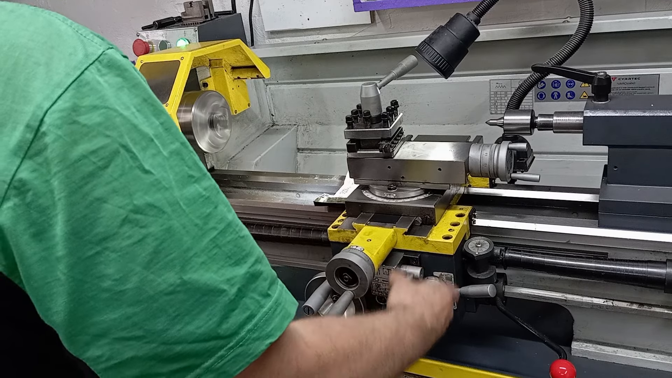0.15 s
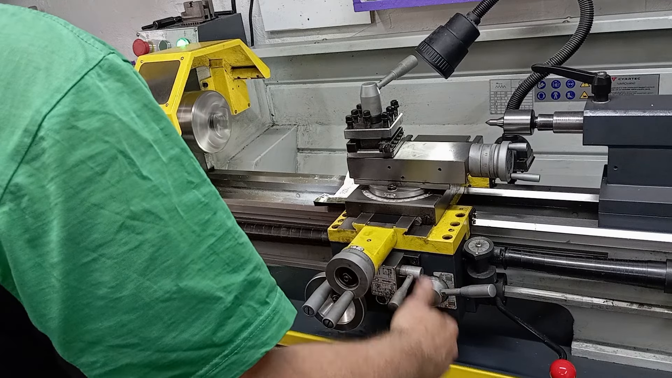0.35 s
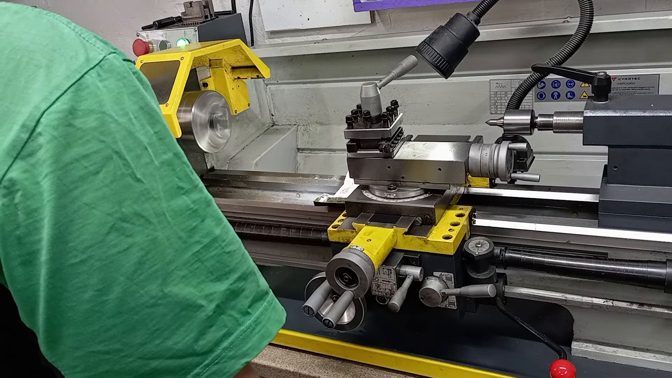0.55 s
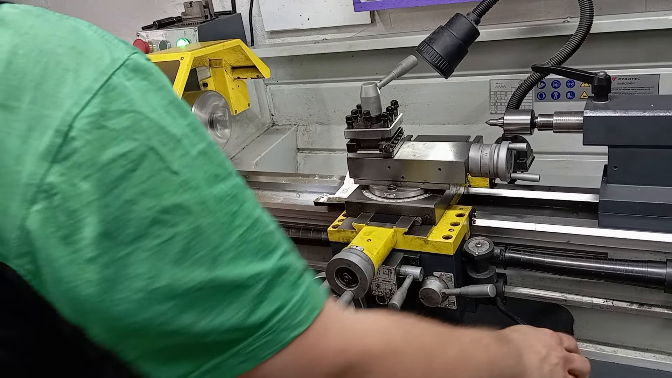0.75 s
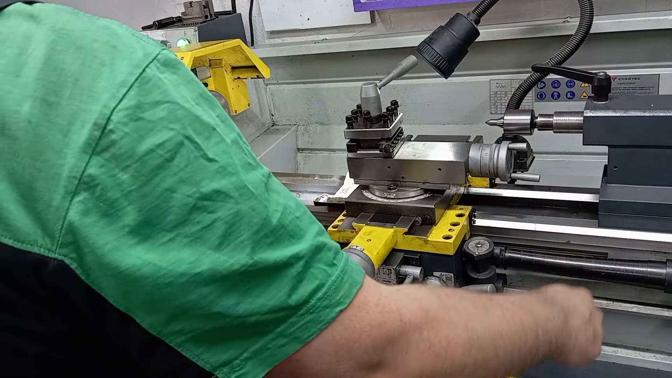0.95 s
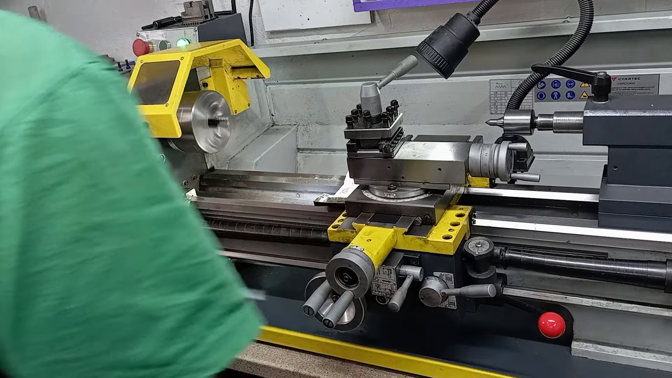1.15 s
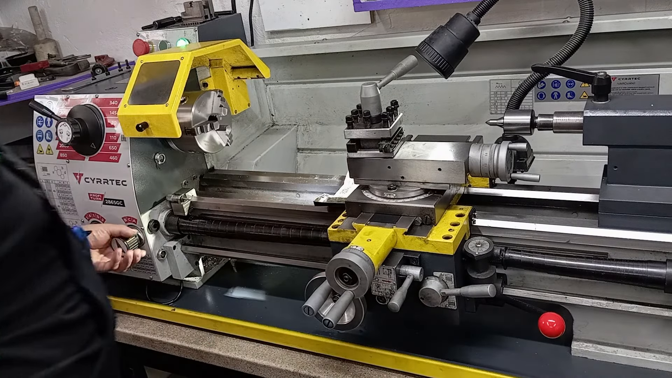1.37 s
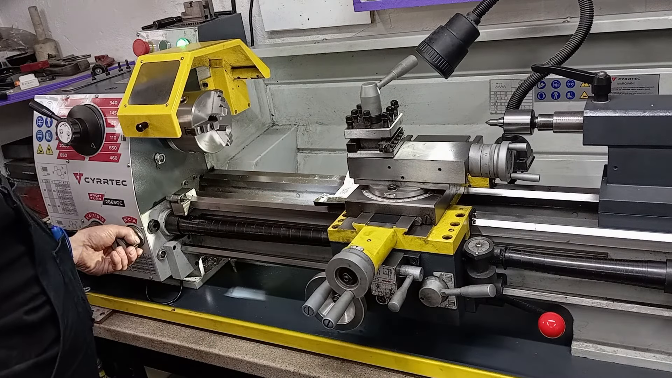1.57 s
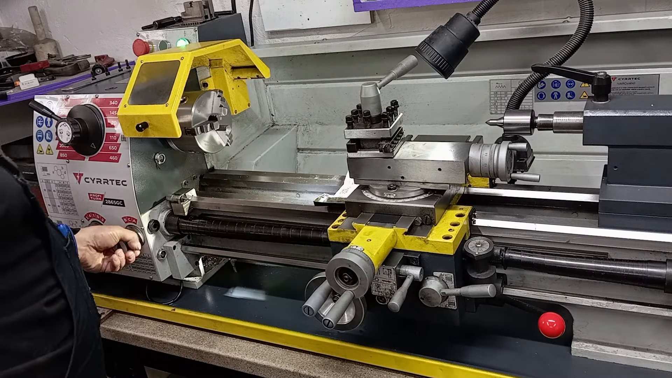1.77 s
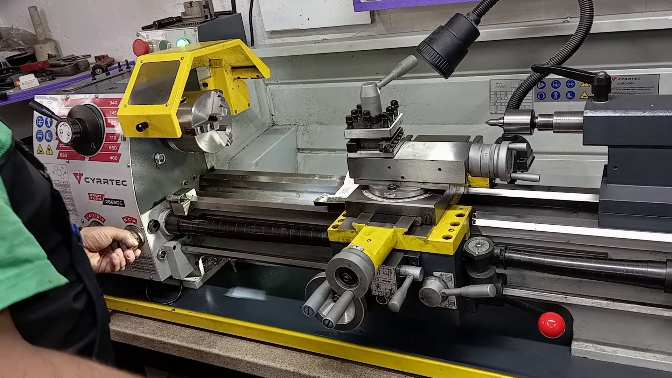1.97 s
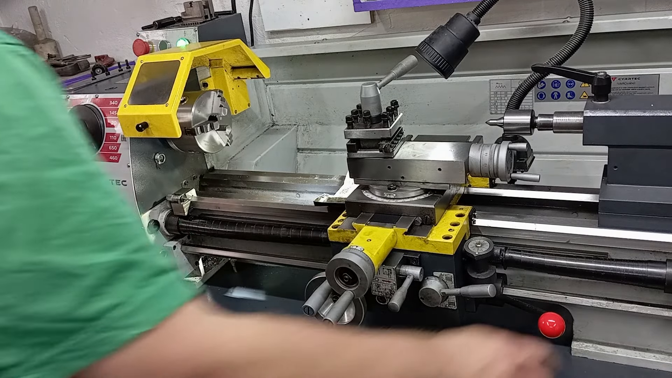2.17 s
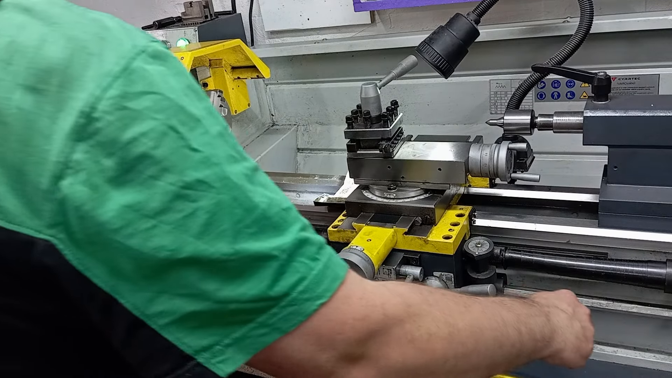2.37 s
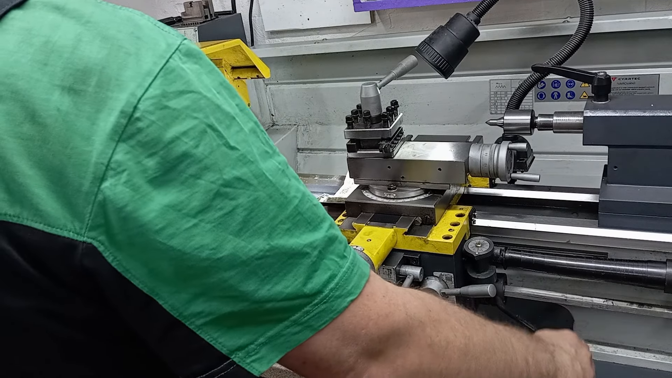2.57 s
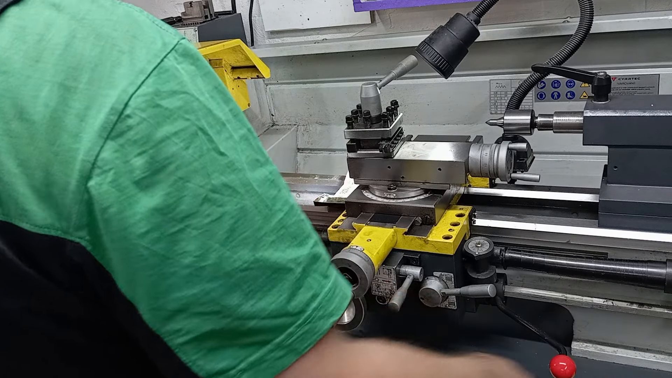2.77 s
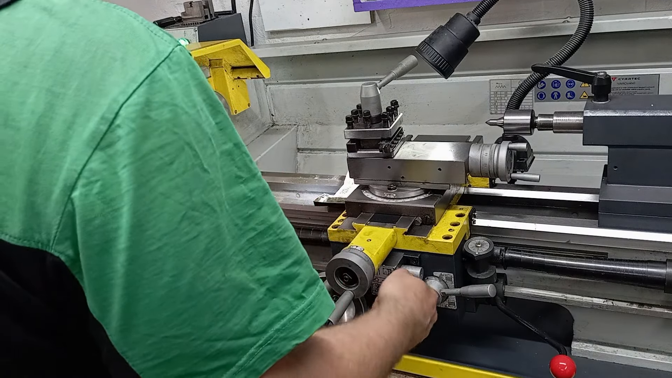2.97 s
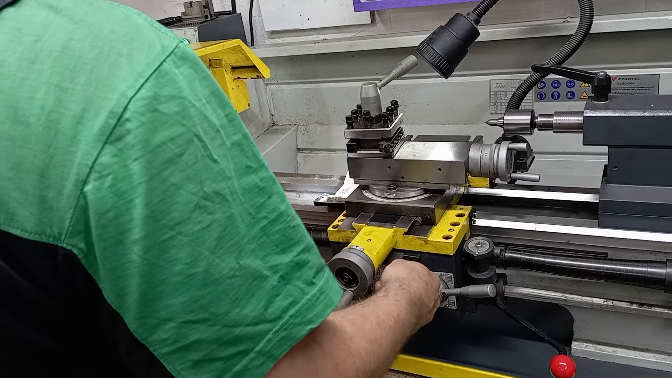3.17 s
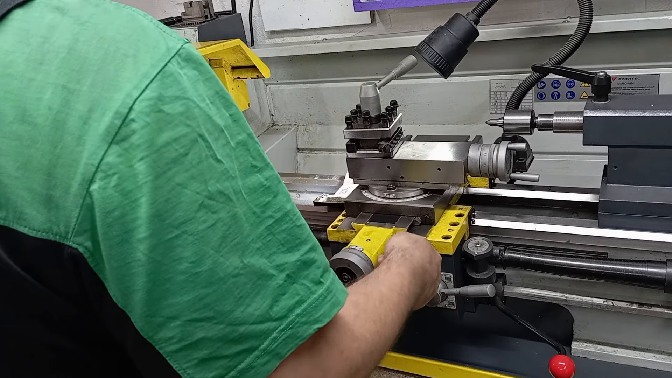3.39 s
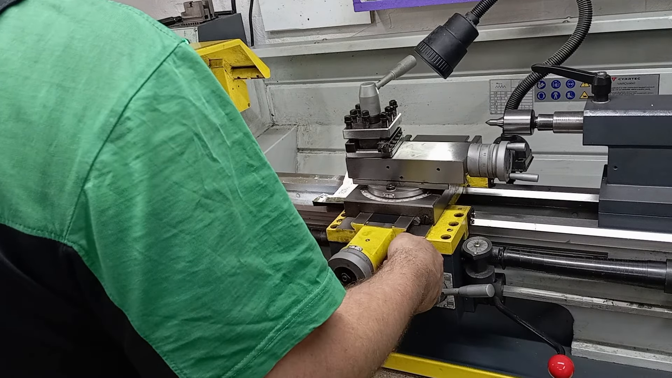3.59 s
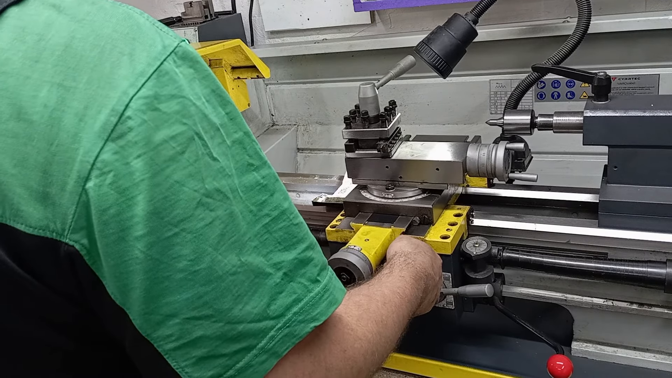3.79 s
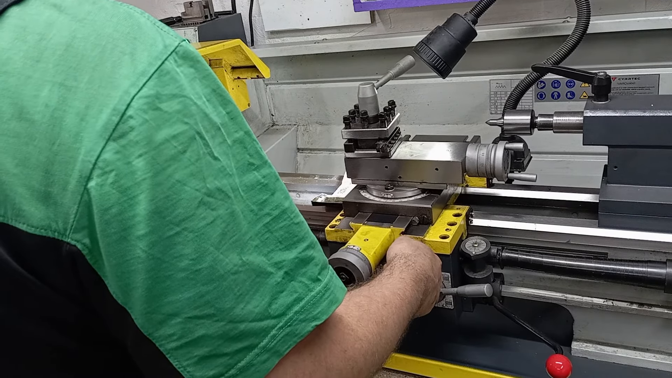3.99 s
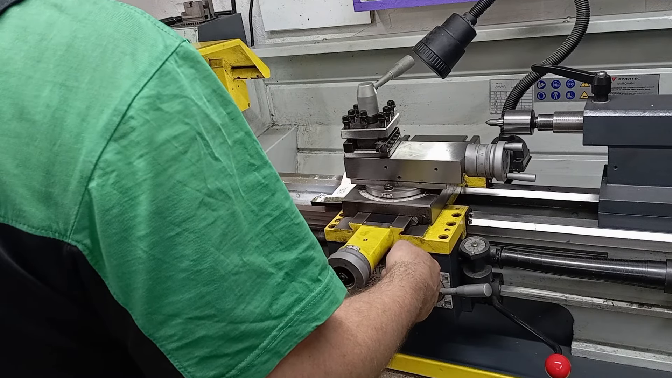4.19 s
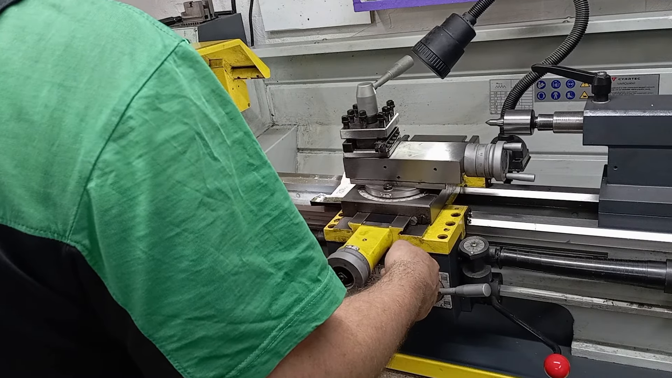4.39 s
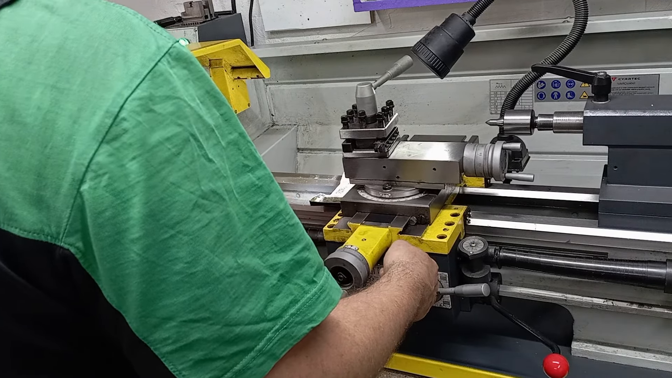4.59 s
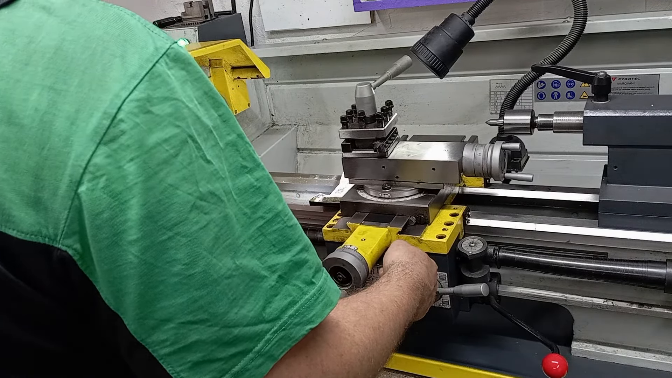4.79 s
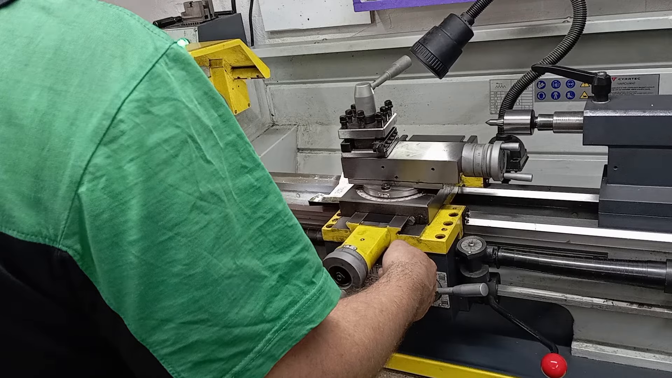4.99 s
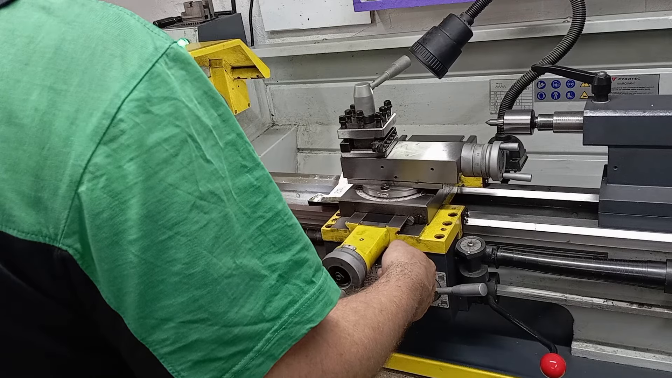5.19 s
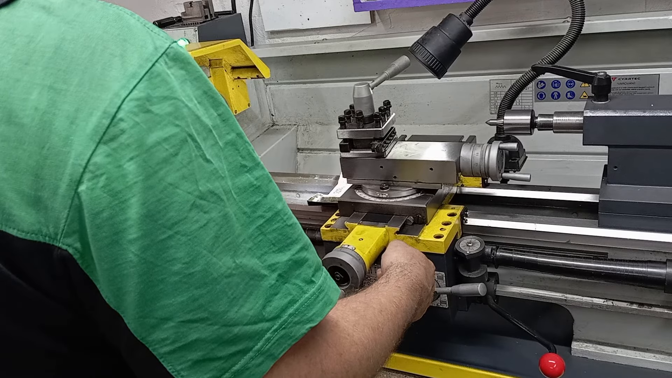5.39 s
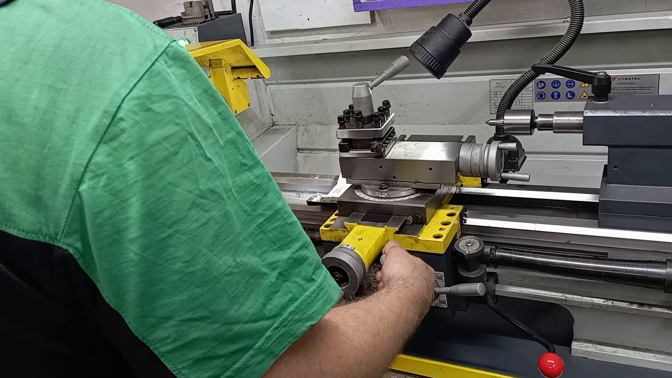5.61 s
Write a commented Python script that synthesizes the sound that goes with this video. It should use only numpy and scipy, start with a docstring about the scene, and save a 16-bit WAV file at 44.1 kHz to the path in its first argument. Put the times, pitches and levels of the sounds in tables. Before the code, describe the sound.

A lathe headstock drones with a piercing, slightly wavering gear whine over rough casting rattle. A metallic clunk cuts power; pitch and brightness fall away in under half a second. Quiet air, soft clothing movement and a sharp lever clack follow. A loud, dense switch clack brings the whine straight back, now with a regular feed-shaft knock emerging. Close, dry workshop pickup, lightly hollow from a near reflection, with little deep bass.

```python
"""In a small workshop a geared lathe headstock whines, is switched off, coasts to a stop and starts again
after a lever is shifted. Gear teeth sing as sines with shaft sidebands; their rattle is noise shaped by the
resonances of the cast housing. A feed shaft then adds orders that gather into a knock each turn. Levers and
switch are decaying noise and modes, over quiet air and rustling clothes; a close reflection combs it all."""
import sys
import numpy as np
from scipy import signal
from scipy.fft import rfft, irfft, next_fast_len
from scipy.io import wavfile
from scipy.ndimage import uniform_filter1d

SR = 44100
rng = np.random.default_rng(int(sys.argv[2]) if len(sys.argv) > 2 else 0)


def store_pcm(level_fs):
    """Save levels as 16-bit WAV."""
    pcm = np.round(np.clip(level_fs, -1, 1) * 32767).astype(np.int16)
    wavfile.write(sys.argv[1], SR, np.atleast_2d(pcm).T)


N = 249159
TIME = np.arange(N) / SR
KNOTS = np.arange(0, N + 256, 256) / SR  # coarse times, in seconds, for slow changes

# All source levels hold before the reflection and the microphone.
# Lines of the main gear mesh. Each row: mesh harmonic, slow-shaft sideband, fast-shaft sideband,
# level before the shift in dB, level after it in dB.
MESH = [(1, 0, 0, -46, -46), (2, -2, 0, -58, -58), (2, -1, 0, -63, -60), (2, 0, 0, -59, -58),
        (3, -2, 0, -60, -64), (3, -1, 0, -58, -57), (3, 0, 0, -47, -49), (3, 1, 0, -56, -58),
        (4, -1, 0, -64, -61), (4, 0, -2, -60, -64), (4, 0, 0, -64, -57), (4, 0, 1, -68, -64),
        (5, -2, 0, -55, -68), (5, -1, 0, -59, -58), (5, 0, -1, -56, -57), (5, 0, 0, -62, -55),
        (5, 1, -1, -60, -67), (6, 0, -2, -59, -65), (6, 0, 0, -57, -68), (6, 1, 0, -60, -69),
        (7, 0, 0, -61, -67), (8, -2, -1, -54, -74), (8, -1, -1, -54, -55), (8, -1, 0, -58, -50),
        (8, 0, -1, -54, -51), (8, 0, 0, -54, -53), (8, 1, 0, -58, -55), (10, -1, -1, -73, -63),
        (10, -1, 0, -79, -57)]
# Other meshes and the motor hum. Each row: frequency at full speed in Hz, level before the shift in dB,
# level after it in dB.
TONES = [(183.7, -90, -81), (195.1, -78, -85), (200.2, -74, -73), (206.6, -73, -80), (297.4, -79, -80),
         (400.0, -67, -68), (469.4, -66, -65), (494.3, -61, -61), (702.9, -65, -64), (733.8, -72, -59),
         (800.4, -59, -59), (1066.2, -62, -55), (1089.1, -66, -60), (1158.8, -57, -49), (1170.2, -58, -62),
         (1199.5, -52, -56), (1240.9, -57, -60), (1280.2, -61, -63), (1286.9, -56, -57), (1297.7, -67, -59),
         (1303.4, -50, -48), (1355.6, -58, -56), (1487.1, -65, -65), (1564.5, -60, -66), (1668.5, -62, -60),
         (1772.8, -57, -60), (1787.9, -63, -63), (1929.2, -58, -58), (1981.4, -63, -66), (2264.7, -62, -63),
         (2317.5, -61, -58), (2398.6, -63, -66), (2502.9, -56, -58), (2515.0, -66, -63), (2837.7, -68, -64),
         (3493.4, -62, -68), (3500.8, -62, -72), (3650.2, -69, -64), (3731.3, -60, -69), (3742.7, -64, -61),
         (3754.5, -56, -52), (3760.9, -69, -53), (3895.5, -64, -57), (3914.3, -61, -64), (4030.1, -56, -70),
         (4041.5, -59, -67), (4049.6, -58, -65), (4055.6, -62, -58), (4062.7, -68, -61), (4568.7, -64, -62),
         (4588.3, -58, -66), (4722.5, -68, -60), (5415.6, -63, -62), (5423.3, -59, -66), (6245.6, -66, -60),
         (6257.4, -60, -61), (6453.9, -59, -71), (6662.8, -76, -66), (7914.1, -71, -64), (7966.3, -69, -65)]
# Orders of the feed shaft, which the shift engages. Each row: order, level in dB.
FEED_ORDERS = [(17, -89), (19, -79), (20, -71.5), (23, -75), (24, -71), (25, -71), (26, -68), (27, -66),
               (28, -75), (29, -69), (31, -71), (32, -69), (33, -72), (34, -66), (35, -65), (36, -61),
               (38, -72), (39, -61), (40, -66), (42, -72), (47, -72), (48, -74), (51, -65), (54, -53),
               (55, -64), (57, -62), (58, -71), (62, -67)]
# Broad radiation of the casting. Each row: frequency in Hz, relative level in dB per Hz.
CASTING = [(40, -117), (90, -116), (160, -103), (300, -97.5), (500, -85.5), (1000, -80), (1700, -87),
           (2600, -84), (4000, -82), (6000, -83.5), (8000, -85), (10500, -85.5), (13000, -94.5),
           (15800, -103)]
# Resonances of the housing. Each row: frequency in Hz, width in Hz, level over the casting in dB.
HOUSING = [(394, 39, 1.5), (520, 89, 7.5), (723, 49, 7), (1343, 360, 6), (2030, 690, 3.5), (2080, 50, 8.5),
           (2509, 84, 7), (3780, 210, 3.5), (4090, 38, 7.5), (4240, 115, 7), (4676, 249, 5.5),
           (5087, 40, 11.5), (5580, 45, 8), (6320, 510, 5), (7040, 350, -1), (7937, 85, 7.5),
           (8130, 55, -2), (8280, 190, 5), (8545, 53, 19.5), (8716, 120, 12.5), (9330, 180, 5.5),
           (10490, 51, 11.5), (10745, 105, 10), (10880, 45, 10.5), (11530, 58, 8.5), (11980, 430, 11.5),
           (12840, 180, 12), (13000, 210, -4), (13900, 185, 15), (15000, 370, -8)]
# Modes that the gliding mesh tones cross. Each row: frequency in Hz, width in Hz, gain in dB.
SWEPT_MODES = [(564, 23, -52), (838, 11.6, -29.5), (1400, 40, -71), (1838, 23, -37.5)]
# Plates that ring on as the shafts stop. Each row: frequency in Hz, starting level in dB, t60 in seconds.
PLATES = [(280, -75, .9), (743, -74, .8), (1174, -74, 1), (1297, -71, .9), (1384, -70, .4)]
# Knocks of lever and switch. Each row: start in seconds, nominal peak in dB, centre in Hz, fall from it in
# dB per octave, t60 at the centre in seconds, thud over the peak in dB, thud pitch in Hz.
KNOCKS = [(1.031, -47, 500, -17, 0.082, 10.5, 317), (1.046, -35, 1550, 8, 0.083, 5.5, 478),
          (1.075, -27, 1400, 5, 0.14, -10, 496), (1.669, -52.5, 3500, 7, 0.086, -8, 444),
          (1.8532, -28.5, 5540, 6, 0.03, -33, 523), (1.858, -35, 2250, 4, 0.16, -5.5, 540),
          (2.1, -58, 3500, 11, 0.084, 0, 150), (2.136, -80.5, 1000, 0, 0.05, 22, 173),
          (2.384, -64, 8000, 9, 0.077, -21, 200), (2.66, -29, 3000, 8, 0.055, -2, 600),
          (2.663, -23, 7000, 14, 0.027, -5, 450), (2.665, -23, 1600, 9.5, 0.2, -9.5, 785),
          (2.671, -28.5, 2300, 22, 0.13, -12, 600), (2.678, -29, 1960, 6, 0.088, 0, 813),
          (2.683, -25.5, 1500, 5.5, 0.12, -8, 800), (2.691, -29, 2000, 8, 0.12, 0, 447)]
# Modes of the lever. Each row: frequency in Hz, relative level in dB, t60 in seconds.
LEVER_MODES = [(515, -9, 0.46), (1386, -2, 0.1), (1860, -18, 0.18), (1990, -15, 0.12), (2565, -6, 0.063),
               (3700, -14, 0.093), (3720, -5, 0.046), (4620, -21, 0.099), (4830, -25, 0.17),
               (6430, -19, 0.059), (7400, -23, 0.073), (8511, -33, 0.19), (8800, -23, 0.1),
               (11100, -32.5, 0.11)]
# Low modes of the bed under a thud. Each row: frequency in Hz, relative level in dB.
BED_MODES = [(150, 4), (172, 4), (317, 2), (445, -4), (478, -16), (540, -9), (605, -19), (790, 3), (815, 0)]
# Spectrum of the workshop air. Each row: frequency in Hz, relative level in dB per Hz.
AIR = [(24, -63), (40, -37.5), (90, -16), (139, -1), (174, -6.5), (591, 3), (1250, -6.5), (1860, -16.5),
       (3140, -15), (4030, -3.5), (5300, -18.5), (15500, -19.5)]
# Faint tones in the workshop. Each row: frequency in Hz, level in dB.
FAINT_TONES = [(597.5, -88), (1217, -95.5), (1809, -92.5), (1860, -95.5), (3518, -93), (3898, -91),
               (4161, -96.5)]
# Rustles of clothes and hands. Each row: loudest moment in seconds, level in dB, rise in dB per second,
# fall in dB per second.
RUSTLES = [(1.44, -74.5, 98, 34), (2.1, -80, 107, 500), (2.25, -82.5, 33, 30), (2.39, -87, 900, 60),
           (2.47, -72, 350, 40)]
# Spectrum of cloth. Each row: frequency in Hz, relative level in dB per Hz.
CLOTH = [(350, -30), (600, -8), (1050, -11), (1400, -3), (1750, -2.5), (2400, -7.5), (3470, -8),
         (8290, -10.5), (15500, -24)]

SHIFT_S = 2
MESH_HZ, SLOW_SHAFT_HZ, FAST_SHAFT_HZ, FEED_HZ = 1072.63, 11.6, 51.8, 13.516  # rates at full speed
OFF_S, UNLOAD_S, STOP_S = 1.04, .035, 1.45  # motor off, time for the teeth to unload, shafts at rest
ON_S, SPIN_UP_S, LOAD_S = 2.665, .046, .03  # motor on, time to full speed, then to full load
FULL_S = ON_S + SPIN_UP_S
FIRST_SPEED = 1.0009  # before the shift, as a share of the speed after it

RATTLE_DB, RATTLE_TILT = -35.5, 0.32  # nominal level at full speed and load in dB, tilt in dB per octave
SLOWING_DB, SLOWING_TILT = 24.5, 5.6  # lost for each tenfold drop of speed: dB, dB per octave
LOOSE_DB, LOOSE_TILT = 2.2, -1.01  # unloaded teeth while coasting: louder in dB, duller in dB per octave
LOOSE_RING_DB, SHARP_HZ, SHARP_FROM_HZ = -8, 130, 7500  # unloaded: narrower, higher resonances ring less
REST_SPEED, REST_S = .035, 0.14  # share of speed added while coasting; its fading time after the stop
JOLT_SPEED = 0.081  # share of speed added to set the brightness of the restart
JOLT_DB = -1  # at the first blow, closing to 0 as speed builds up
SETTLE_DB, SETTLE_TILT, SETTLE_S = -1, -1.6, 0.04  # restart offsets in dB and dB per octave; time to settle
SOFT_HZ, SOFT_DB = 40200, 9.5  # above this pitch times the speed the rattle falls, in dB per octave
SWELL_DB = 0.08  # rms of slow chance in the rattle
FEED_KNOCK_S = 4.532  # time of one feed knock
FEED_SCATTER, FEED_LOCK_S = 0.086, 0.48  # share of phase scatter that stays; decay time of the rest
KNOCK_TOP_HZ = 455  # feed orders below this line up
PLATES_S = 1.4
THUD_FALL_DB = 39  # per octave away from the pitch of the thud
AIR_DB = -75
RUSTLE_END_S = 2.63  # the hand comes to rest on the switch
ECHO_S, ECHO_SHARE = .000465, .55
MIC_HZ, EDGE_HZ = 129, 15740  # bass corner of the microphone, upper band limit


def amp(db):
    """Decibel law: gain of a level in dB."""
    return 10 ** (np.asarray(db) / 20)


def evened(x):
    """Normalization of power: scales to rms 1."""
    return x / np.sqrt(np.mean(x ** 2) + 1e-20)


def read(points, hz):
    """Linear interpolation of a spectrum in dB on a log-frequency axis."""
    f, value = np.transpose(points)
    return np.interp(np.log(hz + 1), np.log(f + 1), value)


def add(mix, s, sound):
    """Superposition: mixes a sound in at s seconds."""
    part = mix[round(s * SR):][:len(sound)]
    part += sound[:len(part)]


def drift(fastest_hz, count=16):
    """Sum of slow sines in random phase: chance of rms 1 at the coarse times."""
    hz = np.geomspace(.3, fastest_hz, count)[:, None]
    waves = np.sin(2 * np.pi * (hz * KNOTS + rng.random((count, 1))))
    return evened((waves / np.sqrt(hz)).sum(0))


def each_sample(slow):
    """Linear interpolation from the coarse times to every sample."""
    return np.interp(TIME, KNOTS, slow)


def noise(colour_db, patchy_db, size=2048):
    """Random short-time spectra: colour_db(hz, s) is the level, and smooth patches vary it."""
    hop = size // 4
    frames, hz = N // hop + 5, np.fft.rfftfreq(size, 1 / SR)
    real, imaginary, patches = rng.standard_normal((frames, len(hz), 3)).T
    patches = uniform_filter1d(patches, size=size // 80, axis=0)  # over frequency
    patches = evened(uniform_filter1d(patches, size=8, axis=1))  # over time
    level = amp(colour_db(hz[:, None], np.arange(frames) * hop / SR) + patchy_db * patches)
    return signal.istft((real + 1j * imaginary) * level, nperseg=size, noverlap=size - hop)[1][:N]


def shaft():
    """Kinematics: speed, tooth load under the motor's push, and the running sum of speed in seconds."""
    speed = np.interp(TIME, [OFF_S + UNLOAD_S, STOP_S, ON_S, FULL_S], [FIRST_SPEED, 0, 0, 1])
    load = np.interp(TIME, [OFF_S, OFF_S + UNLOAD_S, FULL_S, FULL_S + LOAD_S], [1, 0, 0, 1])
    return speed, load, np.cumsum(speed) / SR


def whine(waver_db=2.0, slip_turns=0.1):
    """Modulated gear mesh: harmonics and sidebands tied to shaft speed waver in level and slip in phase."""
    _, load, turns = shaft()
    mesh = [(k * MESH_HZ + slow * SLOW_SHAFT_HZ + fast * FAST_SHAFT_HZ, before_db, after_db)
            for k, slow, fast, before_db, after_db in MESH]
    out = np.zeros(N)
    for hz, before_db, after_db in mesh + TONES:
        level = amp(np.where(KNOTS < SHIFT_S, before_db, after_db) + waver_db * drift(5.))
        slip = rng.random() + slip_turns * np.sqrt(hz / MESH_HZ) * drift(6.)
        out += each_sample(level) * np.sin(2 * np.pi * (hz * turns + each_sample(slip)))
    return np.sqrt(2) * out * load


def rattle(throb=0.058, repeat_db=-8.5, rough_db=1.0):
    """Impact excitation: dense tooth blows ring the housing, with level and treble set by speed and load."""
    speed, load, _ = shaft()
    second = TIME > ON_S
    fading = REST_SPEED * np.exp(-np.maximum(TIME - STOP_S, 0) / REST_S)
    left = np.where(TIME < SHIFT_S, fading, JOLT_SPEED)
    decades = np.log10(np.minimum(speed + left, 1))
    loose = (1 - load) * ~second
    settling = second * np.exp(-np.maximum(TIME - FULL_S, 0) / SETTLE_S)

    tilt = RATTLE_TILT + SLOWING_TILT * decades + LOOSE_TILT * loose + SETTLE_TILT * settling
    coasting_db = SLOWING_DB * decades + LOOSE_DB * loose
    starting_db = SETTLE_DB * settling + JOLT_DB * (1 - speed)
    level_db = RATTLE_DB + np.where(second, starting_db, coasting_db) + SWELL_DB * each_sample(drift(6.))

    def colour_db(hz, at):
        damping = amp(LOOSE_RING_DB * (1 - np.interp(at, TIME, load)))
        rings = 0
        for f, width, db in HOUSING:
            sharp = width < SHARP_HZ and f > SHARP_FROM_HZ
            peak = amp(db) * (damping if sharp else 1)
            rings = rings + peak ** 2 / (1 + (2 * (hz - f) / width) ** 2) ** 2
        corner = SOFT_HZ * 10 ** np.interp(at, TIME, decades)  # slower blows last longer
        soft_db = -SOFT_DB / 4 * np.log2(1 + (hz / corner) ** 4)
        tilt_db = np.interp(at, TIME, tilt) * np.log2((hz + 200) / 3000)
        return soft_db + read(CASTING, hz) + 10 * np.log10(1 + rings) + tilt_db

    # under load the same teeth meet again each turn of the slow shaft: a comb of faint lines
    again = np.resize(rng.standard_normal(round(SR / SLOW_SHAFT_HZ)), N)
    again = irfft(rfft(again) * amp(colour_db(np.fft.rfftfreq(N, 1 / SR), N / SR)), N)
    impacts = evened(noise(colour_db, 1.86)) + amp(repeat_db) * evened(again) * load
    beat = 1 + throb * np.sin(4 * np.pi * SLOW_SHAFT_HZ * TIME)  # two tight spots a full-speed turn
    chance = uniform_filter1d(uniform_filter1d(rng.standard_normal(N), size=200), size=200)
    uneven = amp(rough_db * evened(chance))
    level = uniform_filter1d(((TIME < SHIFT_S) | second) * amp(level_db), size=200)
    return impacts * level * beat * uneven


def coast(rough=1.5):
    """Swept resonance: rough tones of unloaded teeth glide with speed and ring modes; plates decay freely."""
    speed, load, turns = shaft()
    chatter = 1 + rough * evened(uniform_filter1d(rng.standard_normal(N), size=150))
    glide = sum(np.sin(2 * np.pi * (k * MESH_HZ * turns + rng.random())) for k in range(1, 3))
    glide = glide * chatter * (1 - load) * speed ** 2
    out = np.zeros(N)
    for hz, width, db in SWEPT_MODES:
        pole = np.exp((2j * np.pi * hz - np.pi * width) / SR)
        out += amp(db) * 2 * signal.lfilter([1 - abs(pole)], [1, -pole], glide).real
    t = np.arange(SR // 2) / SR
    rings = sum(amp(db - 60 * t / t60) * np.sin(2 * np.pi * (f * t + rng.random()))
                for f, db, t60 in PLATES)
    add(out, PLATES_S, np.sqrt(2) * rings * signal.windows.tukey(len(t), .2))
    return out


def feed(waver_db=2.5, firm_db=2.5, lag_s=0.023):
    """Phase alignment: as low orders of the feed shaft line up they gather into one firm knock a turn."""
    unlocked = np.exp(-np.maximum(TIME - ON_S, 0) / FEED_LOCK_S)
    scatter = FEED_SCATTER + (1 - FEED_SCATTER) * unlocked
    out = np.zeros(N)
    for order, db in FEED_ORDERS:
        hz = order * FEED_HZ
        level = each_sample(amp(db + waver_db * drift(5.)))
        phase = rng.uniform(-.5, .5)  # in turns
        if hz < KNOCK_TOP_HZ:
            level = level * amp(firm_db * (.5 - scatter))
            # the knock's bass comes later than its top, by lag_s for each 200 Hz
            phase = phase * scatter + lag_s * (hz - 350) ** 2 / 400
        out += level * np.cos(2 * np.pi * (hz * (TIME - FEED_KNOCK_S) + phase))
    return np.sqrt(2) * out * shaft()[1] * (TIME > SHIFT_S)


def knock(peak_db, centre_hz, fall_db, t60, thud_db, thud_hz):
    """Modal decay after impact: a crack whose bass lasts longest, the lever's modes, and a thud in the bed."""
    t = np.arange(int(.3 * SR)) / SR
    hz, at, z = signal.stft(rng.standard_normal(len(t)), SR, nperseg=128)
    octaves = np.log2((hz[:, None] + 100) / centre_hz)
    # small parts radiate little bass: the slope is twice as steep below the centre
    slope_db = -fall_db * np.where(octaves < 0, -2 * octaves, octaves)
    colour = amp(slope_db - 60 * at / (t60 * amp(-1.5 * octaves)))
    tail = signal.istft(z * colour, SR, nperseg=128)[1][:len(t)]

    rings = 0
    for f, db, ring_s in LEVER_MODES:
        level = amp(db - fall_db * abs(np.log2(f / centre_hz)) - 60 * t / ring_s)
        rings = rings + level * np.sin(2 * np.pi * (f * t + rng.random()))
    blow = tail / abs(tail).max() + amp(-9.0) * rings / abs(rings).max()

    bed = sum(amp(db - THUD_FALL_DB * abs(np.log2(f / thud_hz))) * np.sin(2 * np.pi * f * t)
              for f, db in BED_MODES)
    thud = amp(thud_db - 60 * t / t60) * bed / abs(bed).max() * (1 - np.exp(-t / 0.0031))
    return amp(peak_db) * (blow * (1 - np.exp(-t / 0.00051)) + thud)


def rustle():
    """Friction noise: cloth-coloured noise swells and fades as the operator moves while the lathe stands."""
    cloth = evened(noise(lambda hz, at: read(CLOTH, hz) + 0 * at, 2.2, size=512))
    moves = sum(amp(db + np.where(TIME < s, rise_db, -fall_db) * (TIME - s))
                for s, db, rise_db, fall_db in RUSTLES)
    return cloth * moves * (TIME < RUSTLE_END_S)


def room():
    """Broadband background: coloured noise for quiet workshop air, with faint tones that waver in level."""
    air = amp(AIR_DB) * evened(noise(lambda hz, at: read(AIR, hz) + 0 * at, 2.7, size=1024))
    for hz, db in FAINT_TONES:
        level = np.sqrt(2) * amp(db + 3.0 * each_sample(drift(5.8)))
        air = air + level * np.sin(2 * np.pi * (hz * TIME + rng.random()))
    return air


def scene():
    """Superposition of headstock, feed shaft, knocks, rustle and room."""
    mix = whine() + rattle() + coast() + feed() + rustle() + room()
    for s, *blow in KNOCKS:
        add(mix, s, knock(*blow))
    return mix[None]


def record(dry):
    """Comb interference from a reflection half a millisecond late; small-microphone bass loss; band limit."""
    size = next_fast_len(N + 256)
    hz = np.fft.rfftfreq(size, 1 / SR)
    comb = 1 + ECHO_SHARE * np.exp(-2j * np.pi * hz * ECHO_S)
    combed = irfft(rfft(dry, size) * comb, size)[:, :N]
    thin = signal.sosfilt(signal.butter(1, MIC_HZ, "high", fs=SR, output="sos"), combed)
    band = signal.firwin(1023, EDGE_HZ, window=("kaiser", 9), fs=SR)
    return signal.oaconvolve(thin, band[None], "same")


dry = scene()
out = record(dry)
store_pcm(out)
```